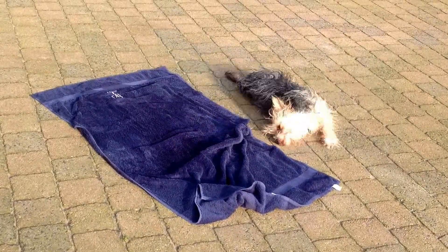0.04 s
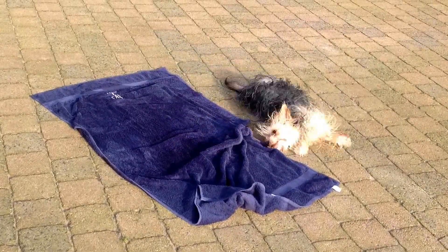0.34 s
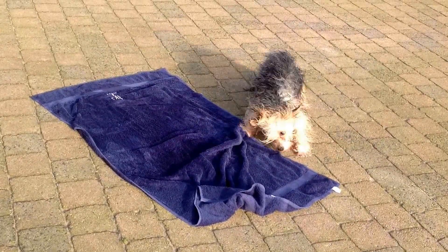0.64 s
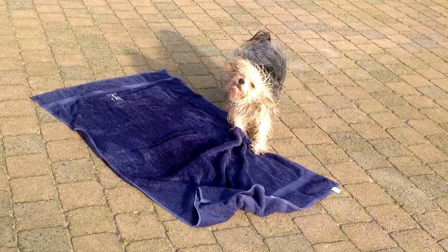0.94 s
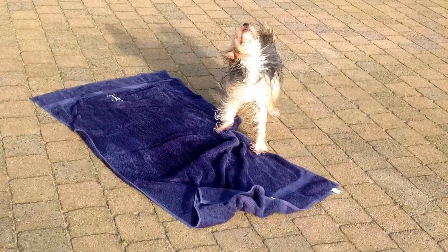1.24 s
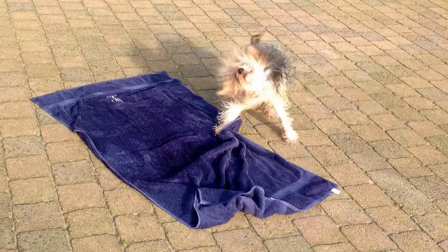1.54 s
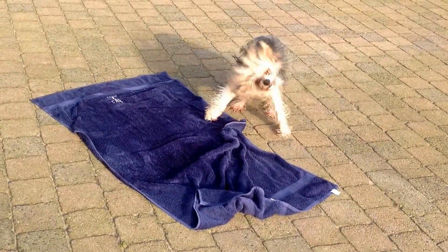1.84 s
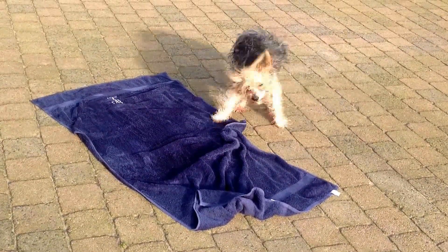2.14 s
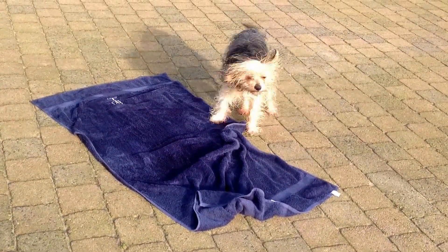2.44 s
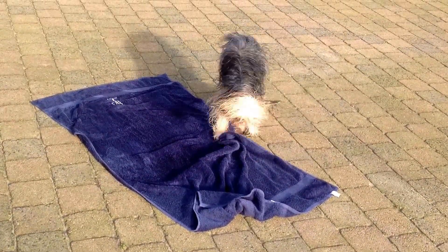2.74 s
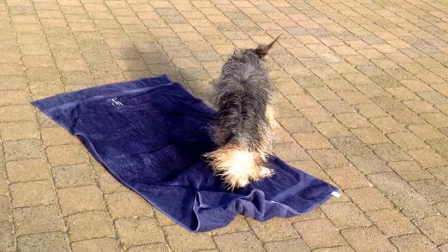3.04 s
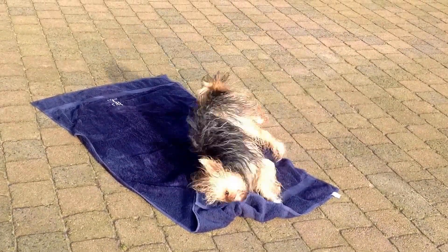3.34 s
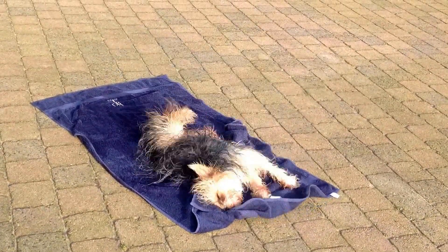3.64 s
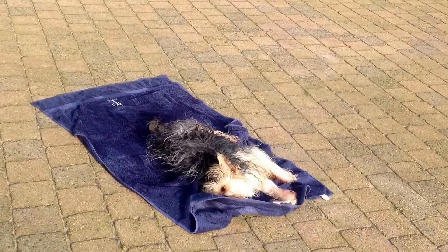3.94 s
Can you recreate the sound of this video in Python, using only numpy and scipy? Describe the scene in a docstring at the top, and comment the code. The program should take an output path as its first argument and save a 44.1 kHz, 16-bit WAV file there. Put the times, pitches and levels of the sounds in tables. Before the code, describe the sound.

A small dog scrambles on paving stones with tapping, skidding claws, shakes its coat with soft ear flaps, then drops onto a towel. Wind rumbles and thumps on the microphone outdoors, and a distant bird whistles faintly.

```python
"""A small dog scrambles up from paving stones, shakes its coat and rolls on a towel.
Its claws tap and skid on the stone, its ears slap, its fur rustles, and it huffs once at the towel.
Gusts of wind rumble and thump as swirling air hits the microphone.
Far off, a songbird repeats a short whistled phrase over a quiet outdoor background."""
import sys
import numpy as np
from scipy import signal
from scipy.fft import rfft, irfft
from scipy.io import wavfile
from scipy.ndimage import uniform_filter1d

SR = 44100
rng = np.random.default_rng(int(sys.argv[2]) if len(sys.argv) > 2 else 0)


def inscribe(sig):
    """Save sig as 16-bit PCM at rate SR to the path in sys.argv[1].

    A 1-D sig is mono; a 2-D sig holds one channel per row.
    Samples are clipped to [-1, 1] before scaling.
    """
    pcm = np.round(np.clip(np.atleast_2d(sig).T, -1, 1) * 32767)
    wavfile.write(sys.argv[1], SR, pcm.astype(np.int16))


N = 176400
T = np.arange(N) / SR

# How strongly fur and towel rub as the dog moves. Each row: time in seconds, relative level in dB.
RUSTLE = [(.17,-60.5),(.25,-50),(.34,-63.5),(1.32,-67.5),(1.43,-59.5),(2.25,-58),(2.45,-62),(2.85,-63),(3.1,-68),(3.78,-67.5),(3.92,-58)]


def claws():
    """Claws tick on stone and kick sand loose; a skid is a shower of tiny ticks over a soft hiss."""
    # Claws landing. Each row: time in seconds, relative level in dB.
    taps = [(.064,-25),(.083,-25),(.091,-21.5),(.17,-39),(.426,-36),(.522,-41),(.577,-41),(.638,-37),(.702,-35),(.757,-35),(.962,-41),(.98,-38),(1.719,-22),(1.7495,-21),(1.869,-32),(2.265,-24),(2.352,-35)]
    # Claws sliding. Each row: time of the peak in seconds, rise in seconds, relative level in dB.
    skids = [(0.097,0.03,-51.5),(.198,0.0055,-38.5),(0.225,0.012,-31),(.257,0.0084,-62),(.47,0.0086,-59),(.535,0.0064,-55),(0.685,0.0022,-45),(1.412,.004,-43),(1.495,.008,-46.5),(1.569,0.019,-47),(1.625,0.021,-44.5),(1.785,.02,-56),(1.847,0.0066,-52),(1.935,0.029,-46),(2.015,0.0026,-38),(2.148,0.021,-37),(2.272,0.013,-42.5),(2.392,0.0027,-50.5),(2.47,0.0083,-55),(2.555,0.0042,-44.5),(2.648,0.009,-58),(2.768,0.0074,-58.5),(2.89,0.013,-60)]
    # The tone of claw on stone. Each row: frequency in Hz, relative level in dB.
    claw_tone = [(600,-55.5),(2800,-6),(4200,-13),(5700,-17.5),(8400,3),(9800,-1.5),(11300,2.5),(12700,-2),(14700,-1)]
    tap_s, sand_per_s, grit_per_s = 0.0018, 86, 1400
    tap_level = sum(undb(db + 0.5) * swell(at, rise=.0001, fall=tap_s) for at, db in taps)
    ticks = tap_level * rng.standard_normal(N) / 2
    grains = (rng.random(N) < sand_per_s / SR) * rng.standard_normal(N)
    kicks = sum(undb(db - 2) * swell(at, rise=tap_s, fall=0.032) for at, db in taps)
    sand = grains * (kicks + undb(curve(RUSTLE) + 16))  # the moving body stirs grains too
    sizes = undb(6 * np.minimum(rng.exponential(size=N), 2))
    grit = unit((rng.random(N) < grit_per_s / SR) * sizes * rng.choice([-1, 1], N))
    hiss = undb(-11.5) * rng.standard_normal(N)
    pressure = sum(undb(db + 2.5) * swell(at, rise, fall=0.015) for at, rise, db in skids)
    return colour(ticks + sand + pressure * (grit + hiss), claw_tone)


def ears_and_coat():
    """Ears and coat slap at each half turn of the shake and as the dog drops on the towel; fur swishes."""
    # The slaps. Each row: time in seconds, relative level in dB.
    flaps = [(1.4302, -36.5), (1.512, -43.5), (1.5859, -37.5), (1.6606, -39.5), (1.7367, -38),
             (1.8137, -45), (1.886, -37), (1.9634, -44.5), (2.032, -42), (2.104, -45), (2.1853, -46),
             (3.5447, -47), (3.5718, -41)]
    # The tones of a slap and of rubbing fur. Each row: frequency in Hz, relative level in dB.
    slap_tone = [(150,7.5),(700,4),(1800,-4.5),(3300,-3),(5000,-31),(16000,-9)]
    fur_tone = [(300,-12),(900,1),(3200,3),(5500,-11),(8300,-4.5),(16000,-12.5)]
    lag_s, hair_spread = 0.0017, 0.82  # a wider spread of hair contact sizes crackles more
    slap_level = sum(undb(db + 2) * swell(at + lag_s, rise=0.001, fall=0.0026) for at, db in flaps)
    swings = sum(swell(at, rise=0.012, fall=0.012) for at, _ in flaps)
    contacts = rng.standard_normal(N) * np.exp(hair_spread * rng.standard_normal(N))
    fur_level = undb(curve(RUSTLE) + 2 * (swings + 0.5))
    return slap_level * noise(slap_tone) + fur_level * unit(colour(contacts, fur_tone))


def huff():
    """A soft puff of breath as the dog pushes its nose at the towel."""
    # The tone of the breath. Each row: frequency in Hz, relative level in dB.
    breath_tone = [(500,-40),(1100,10),(1350,2),(2200,-46)]
    return undb(-54.5) * swell(2.73, rise=0.028, fall=0.011, hold=0.054) * noise(breath_tone)


def wind():
    """Swirling air at the microphone comes in gusts, sputters, and sounds brighter as it grows."""
    # The gusts. Each row: start in seconds, length in seconds, relative level in dB.
    gusts = [(0.01,0.052,-27.5),(0.074,0.21,-37),(0.326,0.044,-29.5),(0.395,0.1,-23.5),(0.541,.21,-28),(0.655,0.065,-22),(0.755,0.11,-22.5),(0.86,0.05,-27),(.91,0.38,-38.5),(1.125,0.041,-26),(1.193,0.078,-28.5),(1.314,0.54,-35.5),(1.542,0.078,-26.5),(2.006,.025,-47),(2.413,.018,-23.5),(2.464,0.015,-30.5),(2.708,.29,-30.5),(2.743,0.11,-29.5),(3.033,0.014,-31.5),(3.076,0.425,-45),(3.527,0.072,-30),(3.663,0.1,-25.5),(3.801,0.22,-27.5)]
    # The tone of light wind, and what strong gusts add. Each row: frequency in Hz, relative level in dB.
    breeze_tone = [(35,-65.5),(70,-18),(110,-10),(165,2),(260,-3),(400,-17.5),(620,-40),(2000,-80.5)]
    gust_tone = [(110,-47),(210,-8.5),(330,4),(480,-5),(700,-17),(1050,-29.5),(3000,-74)]
    power = sum((undb(db) * swell(at, rise=0.0078, fall=0.0077, hold=length)) ** 2
                for at, length, db in gusts)
    wind_db = 10 * np.log10(power + 1e-12)
    brightness = undb(wind_db + 17.5)  # the higher part grows faster than the wind itself
    sputter_db = 5.5 * np.tanh(2 * walk(hz=75) + .5)
    rumble = steady_noise(breeze_tone) + brightness * steady_noise(gust_tone)
    return undb(wind_db + sputter_db - 3) * rumble


def wind_thumps():
    """A single swirl of air thumps the microphone with a quick pull and push."""
    # The swirls. Each row: time in seconds, level in dB, pitch in Hz.
    swirls = [(0.484,-11,293),(.68,-5,332),(.762,-8.5,304),(.817,-8,343),(0.97,-13.5,290),(1.246,-8.5,233),(3.711,-10.5,196),(3.725,-2.5,210)]
    fade_cycles = 0.4
    out = np.zeros(N)
    for at, db, hz in swirls:
        cycles = hz * (T - at)
        out += undb(db) * np.sin(2 * np.pi * cycles) * np.exp(-np.abs(cycles) / fade_cycles)
    return out


def bird():
    """A distant bird sings thin whistles, falling notes and warbles, softened by echo."""
    # Each row: start and length in seconds, first and last pitch in Hz, relative level in dB,
    # amount of warble from 0 to 1.
    notes = [(0.709,0.15,4310,4366,-70,0),(0.864,0.054,3800,3190,-60,.15),(1.013,.08,6650,6520,-71,0.05),(1.019,0.1,4360,3530,-62,0.7),(1.202,0.074,4244,4270,-61.5,0.06),(1.75,0.14,4300,4263,-67,.04),(2.439,0.097,4130,3490,-61.5,.7),(3.145,0.14,4340,4370,-69.5,0.08),(3.3,0.051,3880,3100,-62.5,0),(3.671,0.056,4390,4480,-60.5,0.26),(3.74,0.074,3690,3430,-60.5,0.69)]
    wobble_hz = 298 * walk(hz=183.2)
    song = np.zeros(N)
    for at, length, start_hz, end_hz, db, warble in notes:
        progress = np.clip((T - at) / length, 0, 1)
        hz = end_hz + (start_hz - end_hz) * (1 - progress) ** 2 + warble * wobble_hz
        fade = np.sqrt(2 * np.abs(np.sin(np.pi * progress)))
        song += undb(db) * fade * np.sin(2 * np.pi * np.cumsum(hz) / SR)
    return song + undb(-1.5) * yard_echo(song)


def outdoor_air():
    """A quiet, steady hush lies behind everything."""
    # The tone of the background. Each row: frequency in Hz, relative level in dB.
    air_tone = [(20,-51),(59,-14),(150,1.5),(420,-13.5),(730,-12),(2100,-21),(3200,-31),(5200,-34),(8000,-35),(16000,-36.5)]
    return undb(-54) * noise(air_tone)


def yard_echo(x):
    """Walls and gardens scatter a sound back as a short, blurred echo."""
    echo_s = .4  # time to fade by 60 dB
    tail = rng.standard_normal(N) * np.exp(-np.log(1000) * T / echo_s) * (1 - np.exp(-T / .01))
    return signal.fftconvolve(x, tail / np.sqrt(np.sum(tail ** 2)))[:N]


def undb(db):
    """Turn decibels into a number to multiply by."""
    return 10 ** (np.asarray(db) / 20)


def unit(x):
    """Scale a signal to an average power of 1."""
    return x / np.sqrt(np.mean(x ** 2))


def curve(rows):
    """Join (seconds, value) rows with straight lines."""
    return np.interp(T, *np.array(rows).T)


def colour(x, tone):
    """Filter a sound through (Hz, dB) points, keeping the power of white noise the same."""
    hz, db = np.array(tone).T
    bin_hz = np.arange(N + 1) * SR / (2 * N)
    gain = unit(undb(np.interp(np.log(bin_hz + 1), np.log(hz), db)))
    cepstrum = irfft(np.log(gain))
    cepstrum[1:N] *= 2  # folding this in half makes the filter ring after a tick, never before
    cepstrum[N + 1:] = 0
    return irfft(rfft(x, 2 * N) * np.exp(rfft(cepstrum)))[:N]


def noise(tone):
    """Noise with the given tone and an average power of 1."""
    return unit(colour(rng.standard_normal(N), tone))


def steady_noise(tone):
    """Noise with its slow changes in loudness evened out."""
    x = noise(tone)
    return x / np.sqrt(uniform_filter1d(x ** 2, size=1000))


def walk(hz):
    """A random wander that heads for a new value about hz times a second."""
    step = max(int(SR / hz), 1)
    stairs = np.repeat(rng.standard_normal(N // step + 1), step)
    return unit(uniform_filter1d(stairs, step)[:N])


def swell(at, rise, fall, hold=0):
    """Rise smoothly to 1 at the given time, hold, then die away; all times are in seconds."""
    return np.exp(-(np.minimum(T - at, 0) / rise) ** 2 - np.maximum(T - at - hold, 0) / fall)


def scene():
    """The dog, its faint echo, wind, bird and background meet at one microphone."""
    dog = claws() + ears_and_coat() + huff()
    air = outdoor_air()
    return (dog + undb(-22.5) * yard_echo(dog) + wind() + wind_thumps() + bird() + air)[None]


def record(dry):
    """Thin the deepest bass and cut the highest treble."""
    low_hz, top_hz = 80, 15500
    thin = signal.sosfilt(signal.butter(2, low_hz, "high", fs=SR, output="sos"), dry)
    return signal.sosfilt(signal.ellip(10, .2, 70, top_hz, fs=SR, output="sos"), thin)


dry = scene()
out = record(dry)
inscribe(out)
```